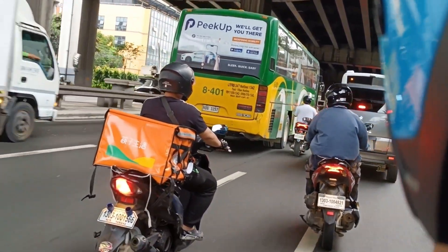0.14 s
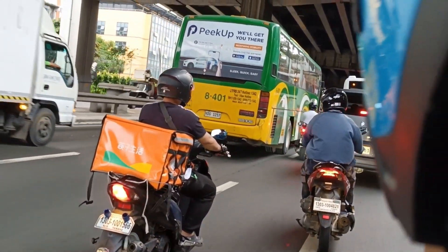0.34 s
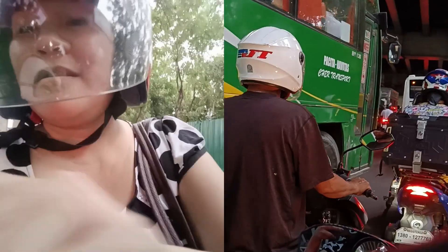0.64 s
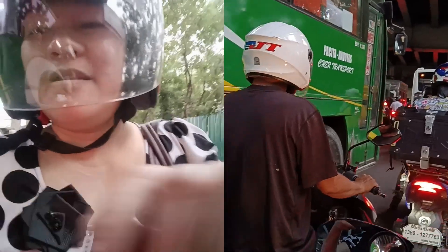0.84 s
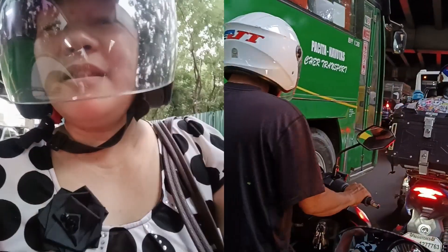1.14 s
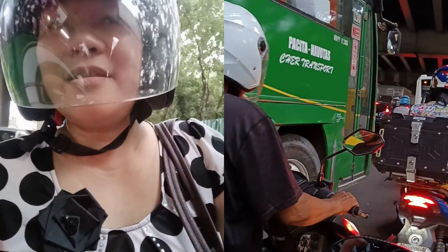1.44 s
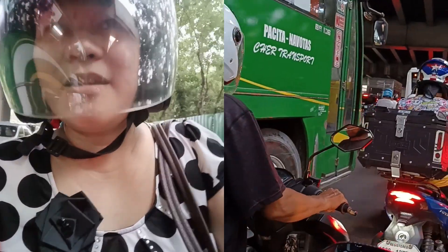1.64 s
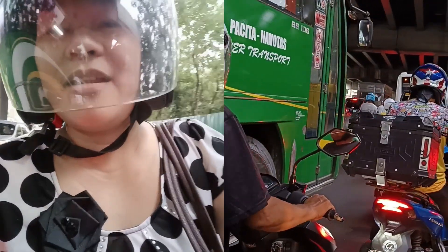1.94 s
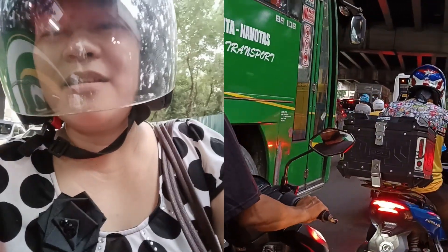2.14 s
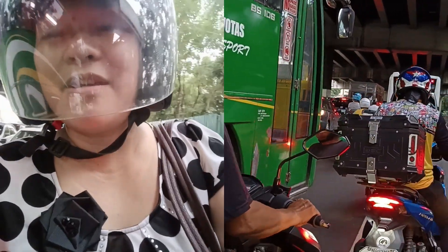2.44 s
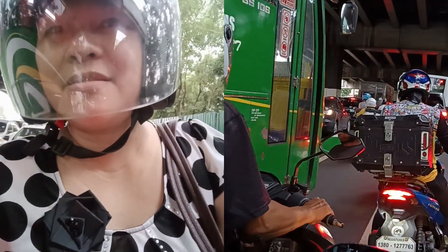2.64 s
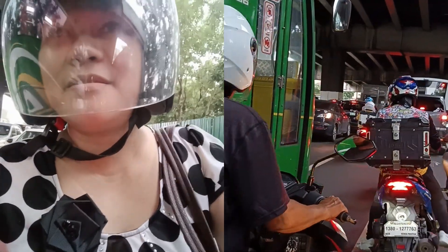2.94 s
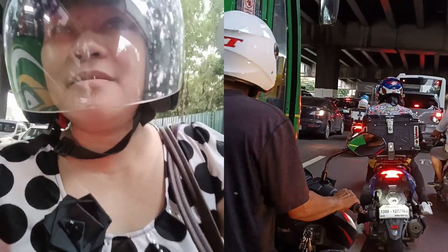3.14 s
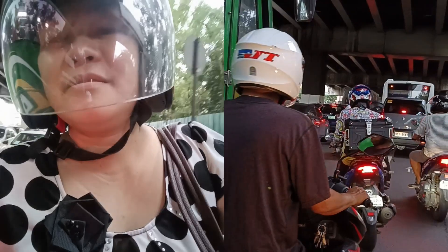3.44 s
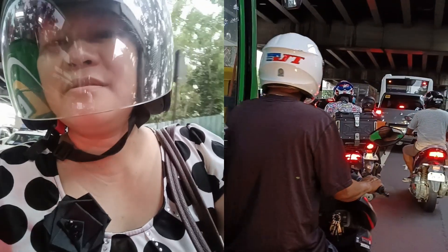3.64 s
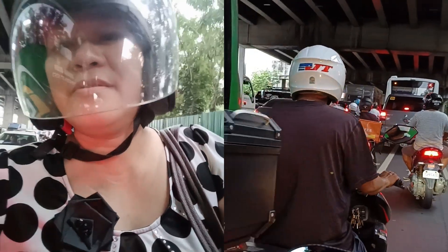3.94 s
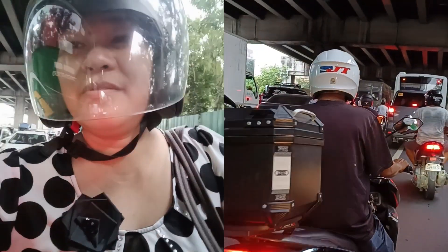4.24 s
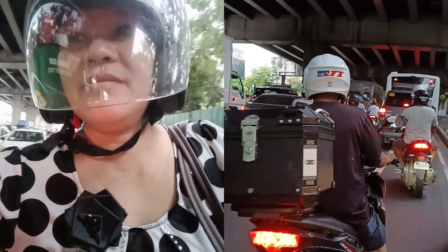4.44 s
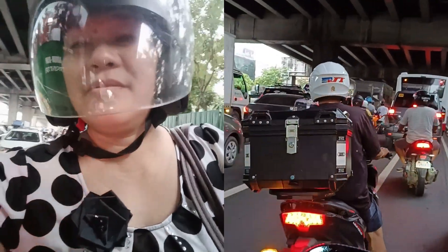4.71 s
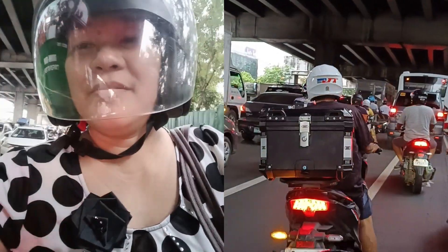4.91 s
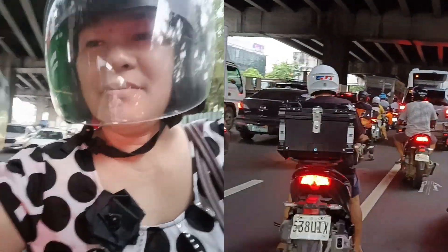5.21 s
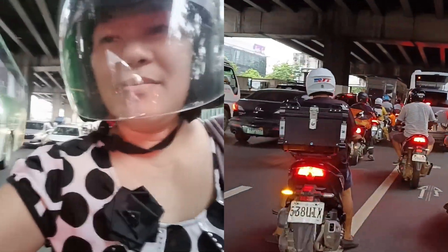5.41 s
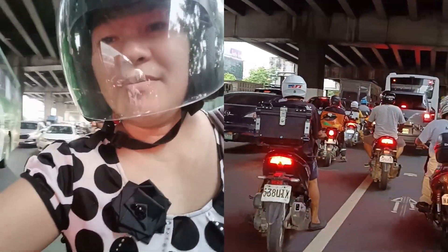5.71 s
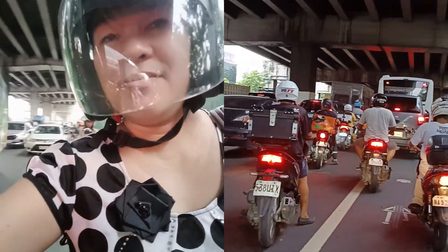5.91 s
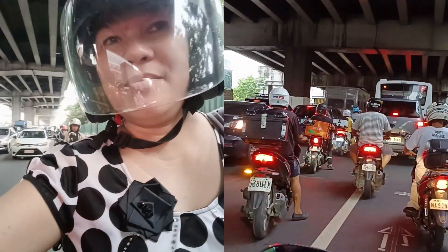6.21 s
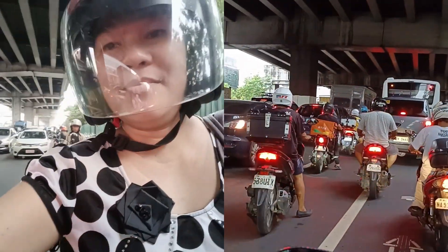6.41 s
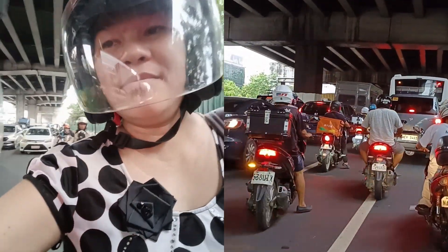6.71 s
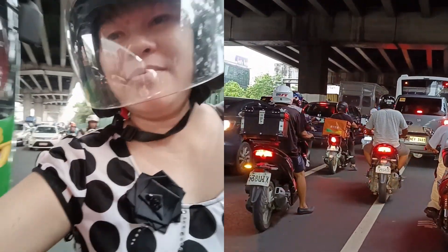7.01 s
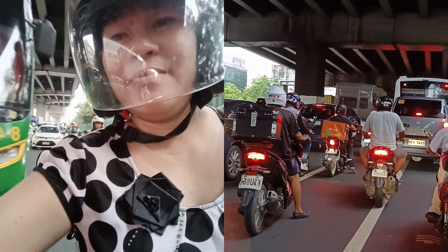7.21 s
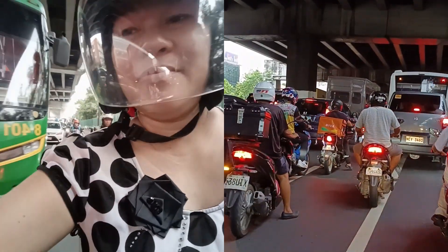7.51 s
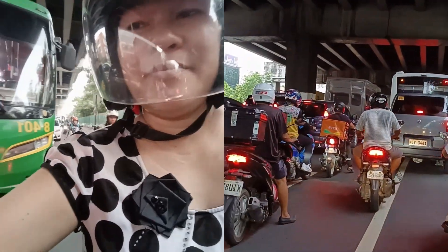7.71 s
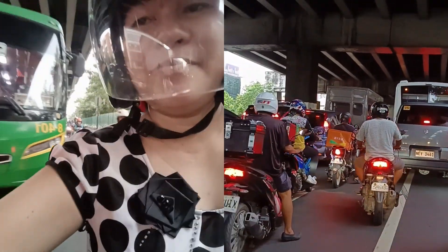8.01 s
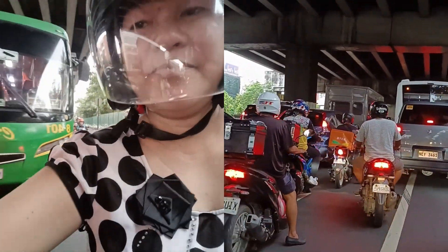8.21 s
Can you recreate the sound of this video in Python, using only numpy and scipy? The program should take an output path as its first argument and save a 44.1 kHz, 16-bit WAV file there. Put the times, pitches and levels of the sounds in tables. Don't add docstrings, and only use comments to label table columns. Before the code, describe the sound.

Dense traffic rumbles under a concrete overpass as scooters idle, a bus pulls away, and assorted electric horns toot and ring between echoing surfaces.

```python
import sys
import numpy as np
from scipy import signal
from scipy.fft import rfft, irfft, next_fast_len
from scipy.io import wavfile
from scipy.ndimage import uniform_filter1d

SR = 44100
rng = np.random.default_rng(int(sys.argv[2]) if len(sys.argv) > 2 else 0)


def dump(signal):
    limited = np.clip(np.atleast_2d(signal).T, -1, 1)
    pcm = np.round(limited * 32767).astype(np.int16)
    wavfile.write(sys.argv[1], SR, pcm)


def to_linear_factor(level_db):
    exponent = np.asarray(level_db, float) / 20
    return 10 ** exponent


N = 368676

LAYER_SPLITS = [90, 330, 1900]
# frequency in Hz, level in dB per Hz.
ROAD_TONE = [(20, -16), (68, -13), (125, 0), (228, -8), (300, -13.5), (446, -21), (1030, -25.5),
             (1530, -31), (3440, -32.5), (5500, -49), (6500, -55), (8300, -41), (10500, -56), (13500, -61),
             (16000, -89)]
# frequency in Hz, likeness from -1 to 1.
LIKENESS = [(25, 0.78), (60, 1), (130, 0.98), (290, 0.93), (640, 0.54), (1410, 0.078), (3100, -0.085),
            (15000, -0.41)]
# time in seconds, gain in dB.
CROWDING = [(0, 1), (.47, .5), (1.04, 6), (1.4, 6), (1.74, 4.5), (1.98, 4), (2.3, 3.5), (2.62, 5.5),
            (2.94, 2.5), (3.3, 1), (4.3, 0.5), (4.9, 0), (5.6, 0), (6.5, .5), (7.24, -1.5), (7.8, 0),
            (8.36, 1.5)]
# level in dB, share of the crowding it follows, slow wander in dB.
LAYERS = [
    (-20.5, 0.31, -0.5),
    (-16, 0.44, 1.5),
    (-24.5, 1, -0.1),
    (-30, 0.94, 0.14),
]
# time in seconds, firing rate in Hz, level in dB.
SCOOTERS = [
    [(0, 28.84, -14), (.5, 28.72, -17.5)],
    [(2.9, 30, -19.5), (3.3, 30.75, -19.5), (3.7, 40.1, -26.5), (4.3, 42.25, -20), (4.5, 37.6, -23.5)],
    [(4.4, 24.96, -23), (4.6, 25.75, -16.5), (5.1, 26.53, -19), (5.8, 24.69, -15), (6.5, 23.6, -20.5),
     (7.1, 23.61, -18.5), (7.4, 22.87, -21.5)],
    [(7.2, 24.35, -41), (7.6, 23, -42), (8.2, 21.94, -17.5), (8.36, 20.25, -39.5)],
]
# frequency in Hz, width in Hz, level in dB.
MUFFLER = [(119.3, 49, 4.5), (209, 66, -5), (60, 9.8, -3.5)]
# time in seconds, firing rate in Hz, level in dB.
BUS = [(1.05, 35.5, -16), (1.194, 34.53, -15.5), (1.3, 38.17, -14.5), (1.632, 40.4, -15.5),
       (2.008, 37.47, -22), (2.41, 36.08, -22), (2.802, 37.54, -28.5), (2.9, 36, -45)]
# multiple of the firing rate, level in dB.
BUS_ORDERS = [(2, -1.5), (3, -15.5), (4, -2.5), (5, 0.3), (6, -2.5), (7, -4.5), (9, -27.5)]
# start in seconds, length in seconds, frequency in Hz, width in Hz, level in dB.
SQUEALS = [
    (3.225, .06, 4400, 150, -27),
    (3.24, .1, 8850, 200, -44),
    (1.35, .4, 990, 40, -33),
    (2.45, .45, 985, 30, -32),
           (-.3, 1.1, 3880, 120, -42),
    (-.3, 1.1, 5200, 1800, -47),
]
HORN_PITCHES = [
    [389.3],
    [352.5, 417.5],
    [447.2],
    [280.8],
    [466.3],
    [352.5, 417.5],
]
# pan in dB, direct sound in dB, echo in dB, scatter of the partials in dB,
# extra pitch at the start as a share.
HORN_PLACES = [(3, 3, -2.5, 3.2, 0.0057), (4.5, 0, 3, 1, 0.0016), (-2.3, -4, 1, .4, 0.0021),
               (2.5, -1, -3.5, 3.2, 0.018), (0, -5, -0.5, 0, 0.0022), (8.5, -2, 1.5, 3.5, .014)]
HORN_ATTACKS = [.003, .006, .003, .002, .02, .004]
HORN_UNSTEADINESS = [.0024, .004, .001, .011, .0017, .002]
HORN_RATTLE = [-62, -66, -60, -3.5, -60, -66]
FIRST_TRUMPET = [-1.5, 0.5, 0.5, 1, 2.5, -10]
# frequency in Hz, width in Hz, level in dB.
DISC_MODES = [
    [],
    [],
    [(429, 21.7, -6.5)],
    [(255.6, 49, 2.5), (3102, 66, 11.5), (5076, 53, -8.5)],
    [],
    [],
]
# start in seconds, length in seconds, level in dB.
TOOTS = [
    [(.95, .25, -30.5)],
    [(2.0, .085, -26.5), (2.15, .1, -26.5), (2.32, .11, -26.5), (2.87, .07, -31)],
    [(2.812, .08, -13.5), (2.985, .11, -10), (3.165, .12, -11.5)],
    [(5.436, .09, -24.5), (5.595, .066, -25.5), (5.72, .05, -22), (5.867, .073, -24.5), (6.012, .08, -22.5),
     (6.165, .067, -22), (6.305, .085, -24), (6.46, .07, -26.5), (6.612, .061, -25)],
    [(7.805, .22, -28), (8.035, .063, -30), (8.2, .16, -35.5)],
    [(7.742, .04, -30), (8.095, .08, -25.5), (8.23, .16, -27)],
]
# frequency in Hz, level in dB.
FIRST_COLOUR = [(390, -28), (2200, -29), (2720, -10), (3120, 1.5), (3500, 7.8), (3900, -13), (5000, -53),
                (12000, -59)]
# frequency in Hz, level in dB.
PAIR_COLOUR = [(400, -42.5), (2100, -29), (2500, -23), (2850, -2), (3170, -0.5), (3350, -5.5), (3550, -11),
               (4200, -40), (6500, -39.5), (8300, -19), (10500, -25), (12000, -24.5), (15000, -79)]
# frequency in Hz, level in dB.
LOUD_COLOUR = [(447, -24.5), (900, -26.5), (2235, -31), (2680, -17), (3130, -0.5), (3575, 2), (4020, -16),
               (4500, -32), (5360, -33), (6250, -51), (8050, -30.5), (10700, -31.5), (12500, -45),
               (13900, -37.5), (15500, -70)]
# frequency in Hz, level in dB.
RATTLY_COLOUR = [(281, -16.5), (500, -62), (1400, -17.5), (1750, -25.5), (2050, -10), (2400, -4.5),
                 (2800, -9), (3400, -13), (4050, -18.5), (4600, -22), (5700, -26), (6050, -64),
                 (8800, -59.5), (10500, -29), (12200, -41.5), (14300, -37), (15800, -78)]
# frequency in Hz, level in dB.
LAST_COLOUR = [(466, -40), (2300, -31.5), (2800, -9), (3260, 4.5), (3730, 1.5), (4190, -16), (4700, -34),
               (7000, -45), (10500, -28), (13000, -60)]
# frequency in Hz, time to fall by 60 dB in seconds.
DECK_T60 = [(300, 1.7), (3000, 0.95), (6000, 0.61), (12000, 0.82)]
# frequency in Hz, left minus right in dB.
PORTS = [(60, -1.2), (250, -0.5), (500, -2.5), (1200, -1.5), (1800, -2.5), (2740, 5), (4200, 5),
         (6000, 3.5), (7000, -11.5), (8300, -46), (10000, -18), (12500, -15), (15000, 4)]
# start in seconds, end in seconds.
PAUSE = (.4645, 1.0465)


def at_hz(points, hz):
    p = np.array(points, float)
    return np.interp(np.log(np.maximum(hz, 1)), np.log(p[:, 0]), p[:, 1])


def rms_one(x):
    return x / np.sqrt(np.mean(x ** 2) + 1e-20)


def span(rows):
    s, *columns = np.transpose(rows)
    cut = slice(int(s[0] * SR), min(int(s[-1] * SR), N))
    t = np.arange(cut.start, cut.stop) / SR
    return cut, [np.interp(t, s, column) for column in columns]


def drift(rate, size=N):
    r = np.exp(-64 * np.pi * min(rate, 300) / SR)
    noise = rng.standard_normal(size // 32 + 2002)
    slow = signal.lfilter([1], [1, -2 * r, r * r], noise)[2000:]
    return np.interp(np.arange(size) / 32, np.arange(len(slow)), rms_one(slow))


def resonate(x, hz, width):
    r = np.exp(-np.pi * width / SR)
    feedback = [1, -2 * r * np.cos(2 * np.pi * hz / SR), r * r]
    return signal.lfilter(np.array([1, 0, -1]) * (1 - r * r) / 2, feedback, x)


def coloured(x, gain_db):
    size = next_fast_len(N)
    hz = np.arange(size // 2 + 1) * SR / size
    return irfft(rfft(x, size) * to_linear_factor(gain_db(hz)), size)[..., :N]


def wash(patchy_db, swell_db):
    crowd_db = np.interp(np.arange(N) / SR, *np.transpose(CROWDING))
    mid, side = coloured(rng.standard_normal((2, N)), lambda hz: at_hz(ROAD_TONE, hz))
    size = next_fast_len(N)
    hz = np.maximum(np.arange(size // 2 + 1) * SR / size, 1)
    alike = np.clip(at_hz(LIKENESS, hz), -1, 1)
    mid = rfft(mid, size) * np.sqrt(1 + alike)
    side = rfft(side, size) * np.sqrt(1 - alike)
    both = np.array([mid + side, mid - side])
    groups = np.zeros((4, 2, N))
    together = drift(7.2)
    for centre in 16 * 2 ** np.arange(0, 10.6, .75):
        skirt = np.cos(np.pi / 2 * np.clip(np.log2(hz / centre) / .75, -1, 1)) ** 2
        flicker = to_linear_factor(swell_db * together + patchy_db * drift(7.2))
        groups[np.searchsorted(LAYER_SPLITS, centre)] += flicker * irfft(both * skirt, size)[:, :N]
    out = np.zeros((2, N))
    for group, (db, share, wander_db) in zip(groups, LAYERS):
        out += to_linear_factor(db + share * crowd_db + wander_db * drift(2.25)) * rms_one(group)
    return out


def scooters(uneven_db, jitter):
    out = np.zeros(N)
    for rows in SCOOTERS:
        cut, (rate, level_db) = span(rows)
        turns = np.cumsum(rate * (1 + jitter * drift(8.0, size=len(rate)))) / SR
        firings = np.diff(np.floor(turns), prepend=0)
        pulses = firings * to_linear_factor(uneven_db * rng.standard_normal(len(rate)))
        exhaust = np.zeros(len(rate))
        for hz, width, db in MUFFLER:
            ring = resonate(resonate(pulses, hz, width), hz, 2 * width)
            exhaust += to_linear_factor(db) * ring * width ** -.5
        out[cut] += to_linear_factor(level_db) * rms_one(exhaust)
    return out


def bus():
    out = np.zeros(N)
    cut, (rate, level_db) = span(BUS)
    phase = 2 * np.pi * np.cumsum(rate) / SR
    for order, db in BUS_ORDERS:
        strength = to_linear_factor(level_db + db + 1.5 * drift(1.1, size=len(rate)))
        out[cut] += np.sqrt(2) * strength * np.sin(order * phase + rng.uniform(0, 2 * np.pi))
    return out


def brakes():
    out, t = np.zeros(N), np.arange(N) / SR
    noise = rng.standard_normal(N)
    for start, length, hz, width, db in SQUEALS:
        shape = np.sin(np.pi * np.clip((t - start) / length, 0, 1)) ** .5
        out += to_linear_factor(db) * shape * rms_one(resonate(resonate(noise, hz, width), hz, width))
    peak_s, shut_s, rise_s, fall_s = 2.67, 2.82, .04, .06
    away = np.abs(t - peak_s)
    burst = np.exp(-(away / np.where(t < peak_s, rise_s, fall_s)) ** 2)
    leak = to_linear_factor(-9) * np.exp(-away / .3)
    valve = np.clip((shut_s - t) / 0.016, 0, 1) * (t > PAUSE[1])
    air = rng.standard_normal(N)
    for hz in (7970, 8100, 8150):
        air = resonate(air, hz, 1100)
    return out + to_linear_factor(-29.5) * (burst + leak) * valve * rms_one(air)


def deck(x, t60s, length):
    t, tail = np.arange(int(length * SR)) / SR, 0
    white = rng.standard_normal((2, len(t)))
    for low in 100 * 2.0 ** np.arange(0, 7.5, 1):
        octave = signal.butter(2, [low, min(2 * low, 20000)], "band", fs=SR, output="sos")
        mid, side = signal.sosfilt(octave, white)
        centre = low * np.sqrt(2)
        alike = np.clip(at_hz(LIKENESS, centre), -1, 1)
        band = np.sqrt(1 + alike) * mid + np.sqrt(1 - alike) * side * [[1], [-1]]
        tail = tail + band * to_linear_factor(-60 * t / at_hz(t60s, centre))
    tail = tail / np.sqrt(np.sum(tail ** 2, axis=1, keepdims=True))
    return signal.fftconvolve(x, tail, axes=1)[:, :N]


def moving_paths(x, wander_s):
    n = np.arange(N)
    return np.array([np.interp(n + wander_s * SR * drift(13.6), n, channel) for channel in x])


def horn(pitches, scatter_db, sharp, attack, unsteady, rattle_db, lower_db, disc, toots, colour, flutter_db=3.0):
    out = np.zeros(N)
    for start, length, level_db in toots:
        t = np.arange(int((length + .04) * SR)) / SR
        gate = np.clip(t / attack, 0, 1) * np.exp(-np.maximum(t - length, 0) / 0.0073)
        for hz, tone_db in zip(pitches, [lower_db, 0]):
            bend = sharp * np.exp(-t / 0.019) - 0.009 * (t / length) ** 4
            pitch = hz * (1 + bend + unsteady * drift(9.0, size=len(t)))
            halves = np.arange(2, int(31000 / hz), 1 if rattle_db > -40 else 2)[:, None]
            beat_hz = rng.uniform(22, 48, halves.shape)
            beats = np.sin(2 * np.pi * beat_hz * t + rng.uniform(0, 2 * np.pi, halves.shape))
            strokes = np.where(halves % 2, to_linear_factor(rattle_db), 1)
            weights = strokes * to_linear_factor(flutter_db * beats + scatter_db * rng.standard_normal(halves.shape))
            half_phase = np.pi * np.cumsum(pitch) / SR
            comb = (weights * np.cos(halves * half_phase + .3 * halves ** 2)).sum(axis=0)
            i = int(start * SR)
            out[i:i + len(t)] += (to_linear_factor(level_db + tone_db) * np.sqrt(2) * gate * comb)[:N - i]
    ringing = np.zeros(N)
    for hz, width, db in disc:
        ringing += to_linear_factor(db) * resonate(resonate(out + 1e-18, hz, width), hz, 8 * width)
    return coloured(out, lambda hz: at_hz(colour, hz)), ringing


def scene():
    near, far = np.zeros((2, N)), np.zeros((2, N))
    colours = [FIRST_COLOUR, PAIR_COLOUR, LOUD_COLOUR, RATTLY_COLOUR, LAST_COLOUR, PAIR_COLOUR]
    voices = zip(HORN_PITCHES, HORN_PLACES, HORN_ATTACKS, HORN_UNSTEADINESS, HORN_RATTLE, FIRST_TRUMPET,
                 DISC_MODES, TOOTS, colours)
    for pitches, place, *voice in voices:
        pan_db, near_db, echo_db, scatter_db, sharp = place
        housing, disc = horn(pitches, scatter_db, sharp, *voice)
        pan = to_linear_factor(np.array([[.5], [-.5]]) * pan_db)
        near += pan * (to_linear_factor(near_db) * housing + to_linear_factor(-4.0) * disc)
        far += pan * (to_linear_factor(echo_db) * housing + disc)
    direct = moving_paths(near, wander_s=1.8e-5)
    echoes = moving_paths(deck(far, DECK_T60, length=1.7), wander_s=5e-5)
    engines = bus() + scooters(uneven_db=2, jitter=.01)
    return wash(patchy_db=0.73, swell_db=0.25) + engines + brakes() + direct + echoes


def gain_control(x, ceiling_db, release_db_per_s):
    treble = signal.sosfilt(signal.butter(2, 900, "high", fs=SR, output="sos"), x)
    level = 10 * np.log10(uniform_filter1d(treble ** 2, 440, axis=1) + 1e-12)
    ramp = release_db_per_s * np.arange(N) / SR
    held = np.maximum.accumulate(level + ramp, axis=1) - ramp
    excess = np.maximum(held - ceiling_db, 0)
    return x * to_linear_factor(-uniform_filter1d(excess, 200, axis=1))


def ports_db(hz):
    left = 1 / (1 + to_linear_factor(-2 * at_hz(PORTS, hz)))
    return 10 * np.log10(2 * np.array([left, 1 - left]))


def low_pass(x):
    return signal.sosfilt(signal.butter(12, 16270, fs=SR, output="sos"), x)


def record(dry):
    x = gain_control(coloured(dry, ports_db), ceiling_db=-11.0, release_db_per_s=100.0)
    x = x / (1 + x ** 6) ** (1 / 6)
    t = np.arange(N) / SR
    before = np.sin(np.pi / 2 * np.clip((PAUSE[0] + .002 - t) / .006, 0, 1)) ** 2
    running = before + (t > PAUSE[1])
    return low_pass(x * running)


dry = scene()
out = record(dry)
dump(out)
```